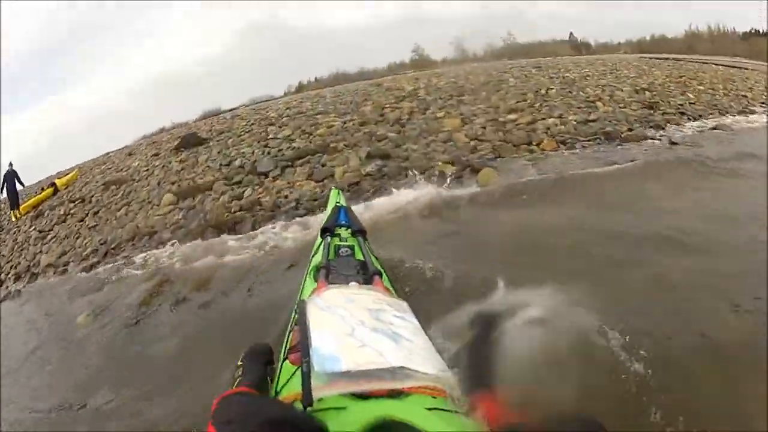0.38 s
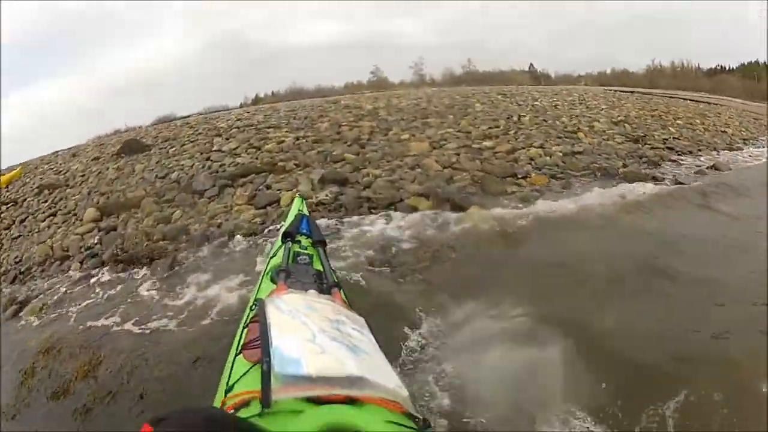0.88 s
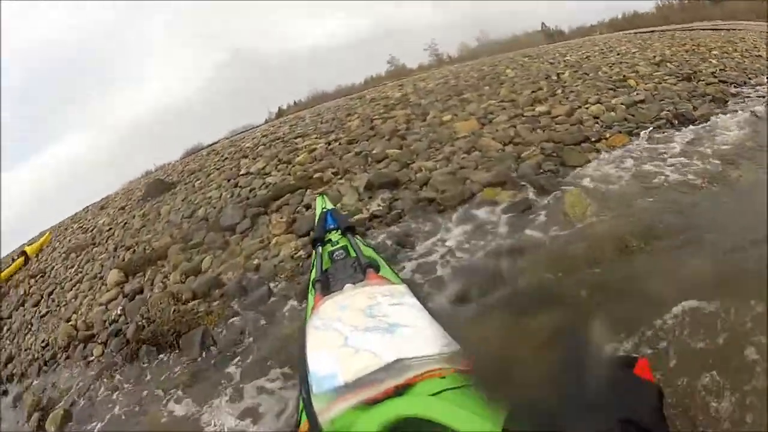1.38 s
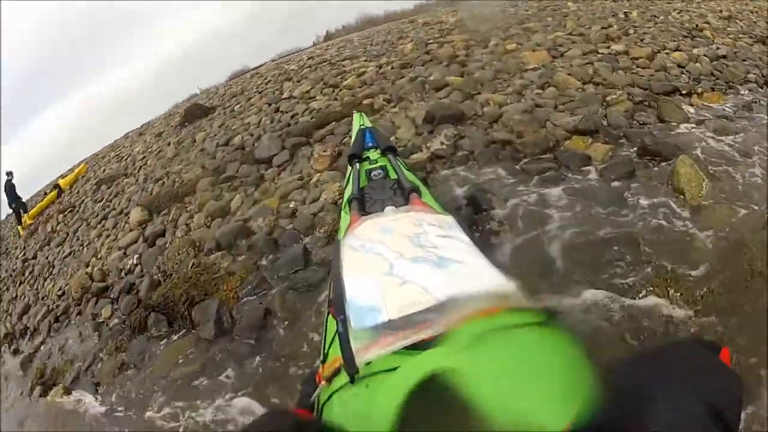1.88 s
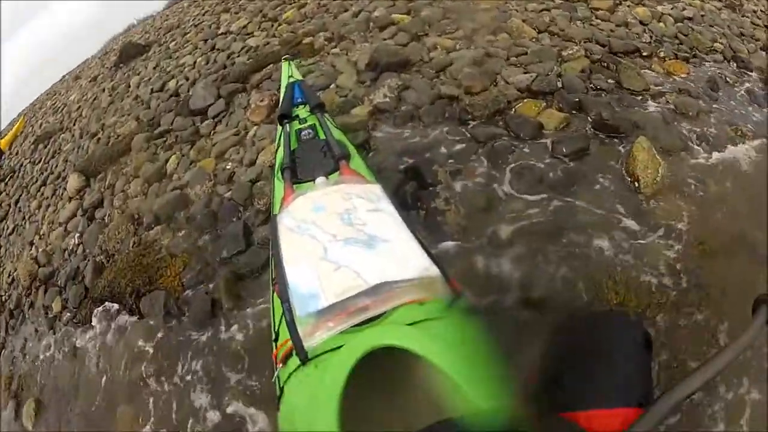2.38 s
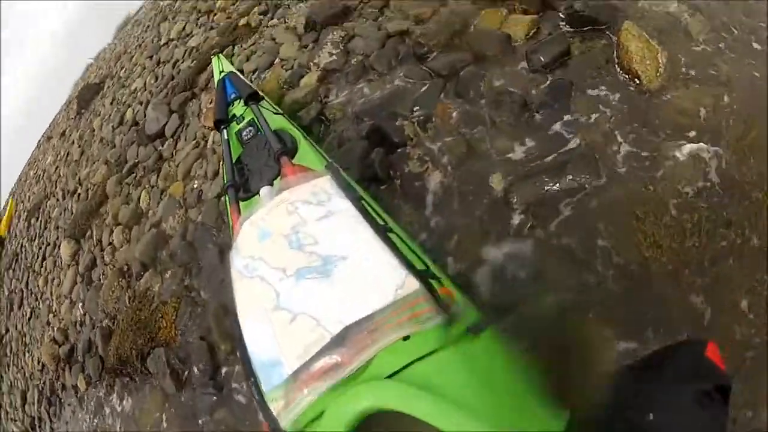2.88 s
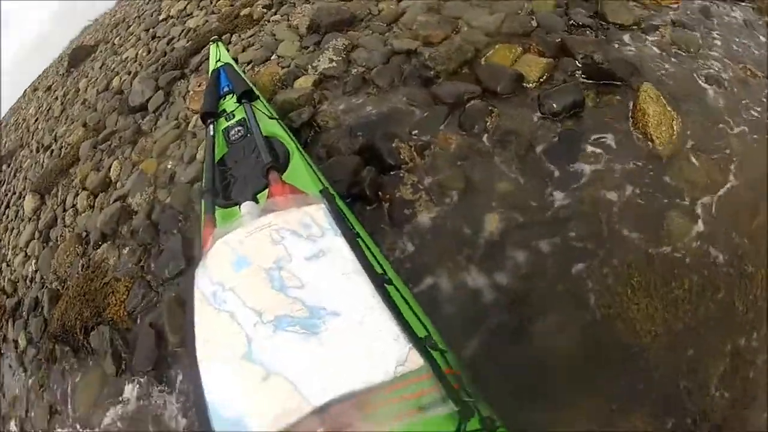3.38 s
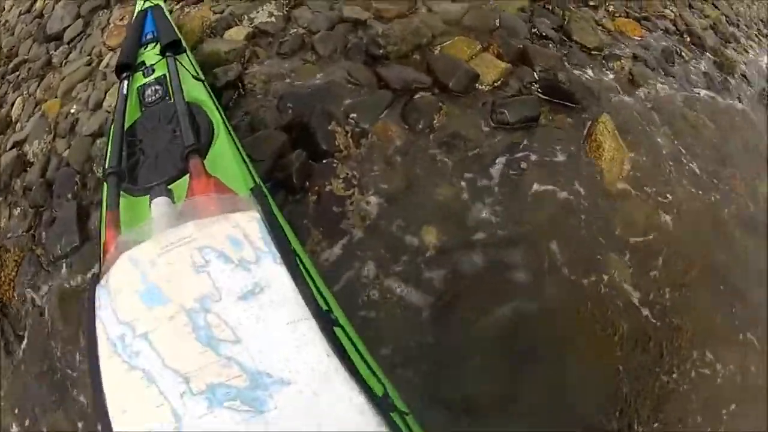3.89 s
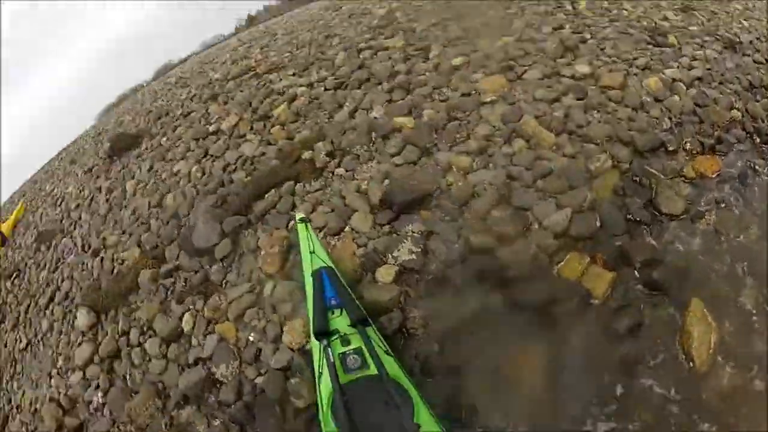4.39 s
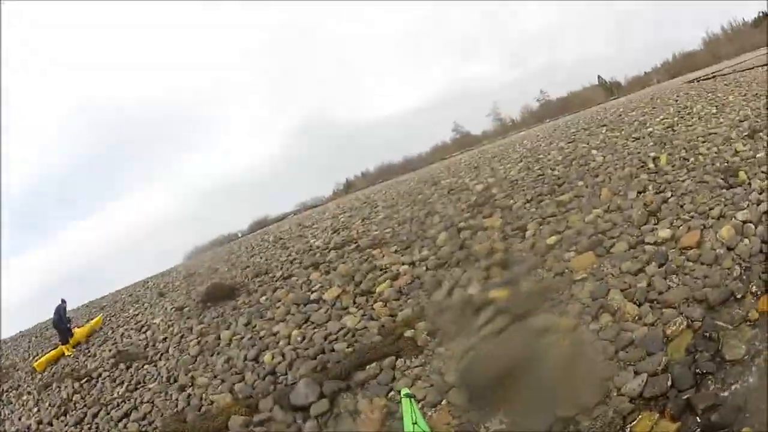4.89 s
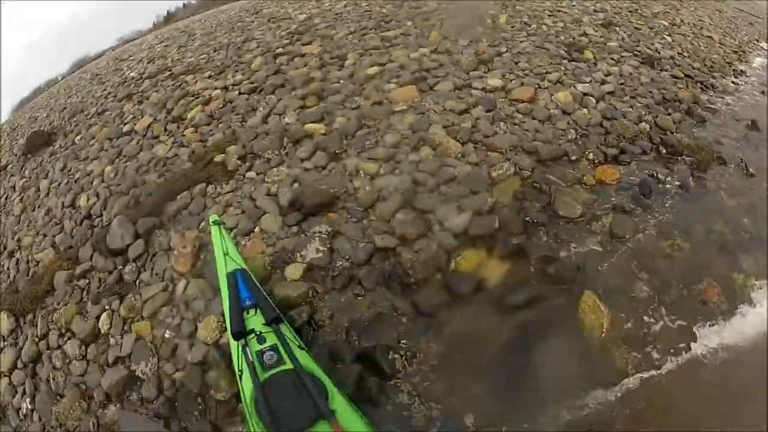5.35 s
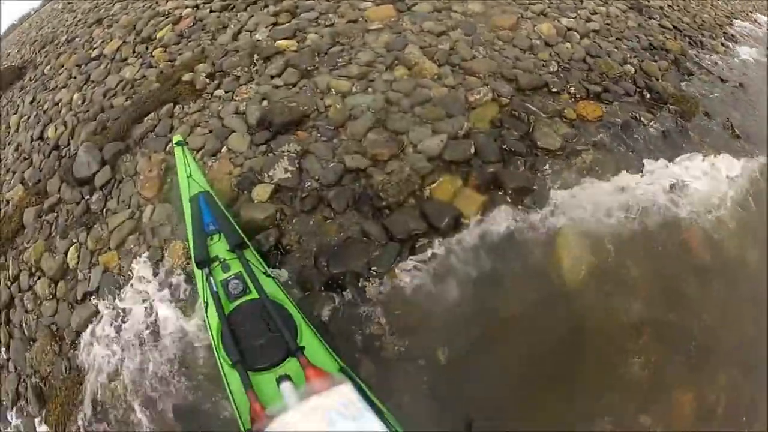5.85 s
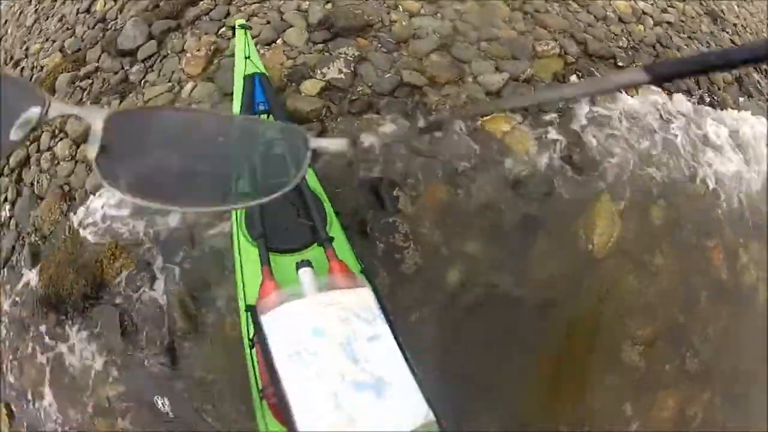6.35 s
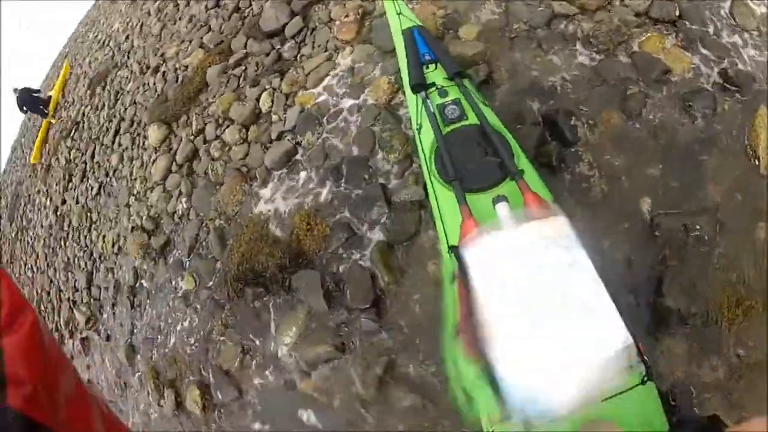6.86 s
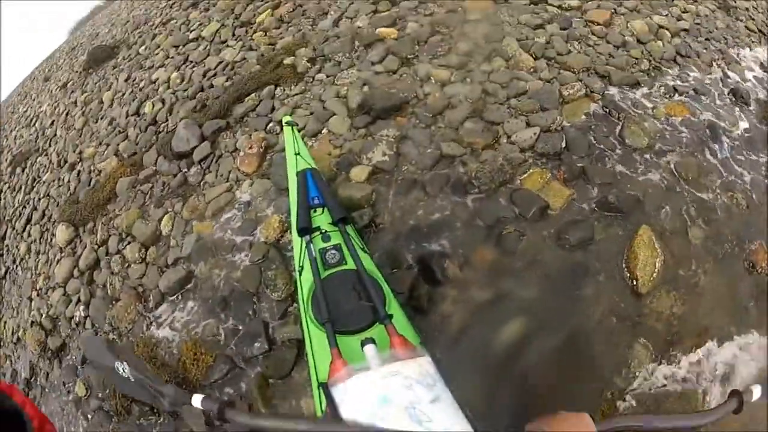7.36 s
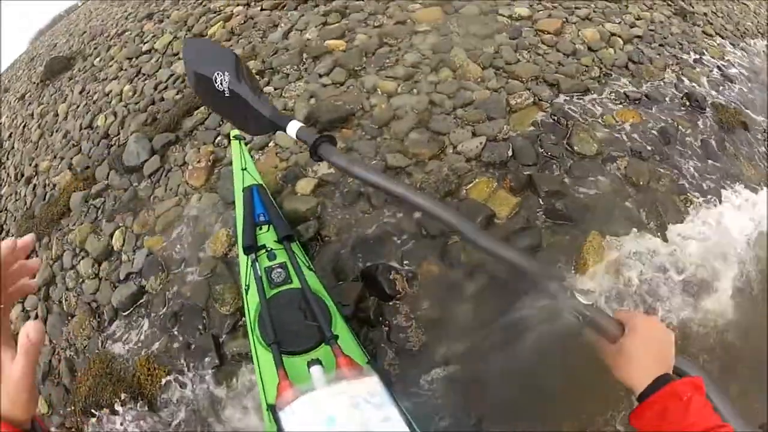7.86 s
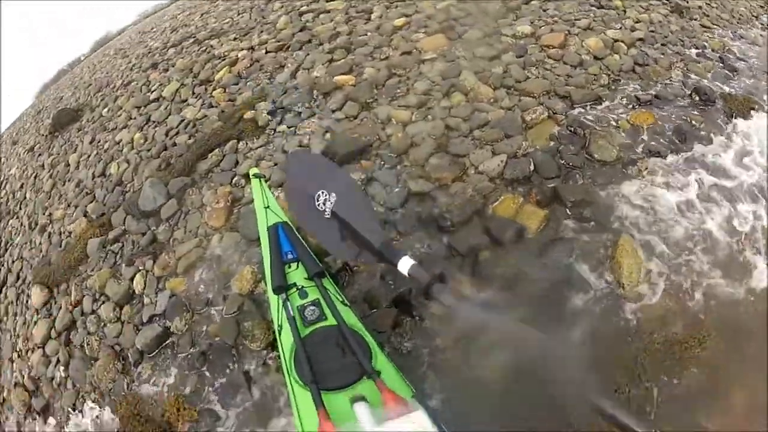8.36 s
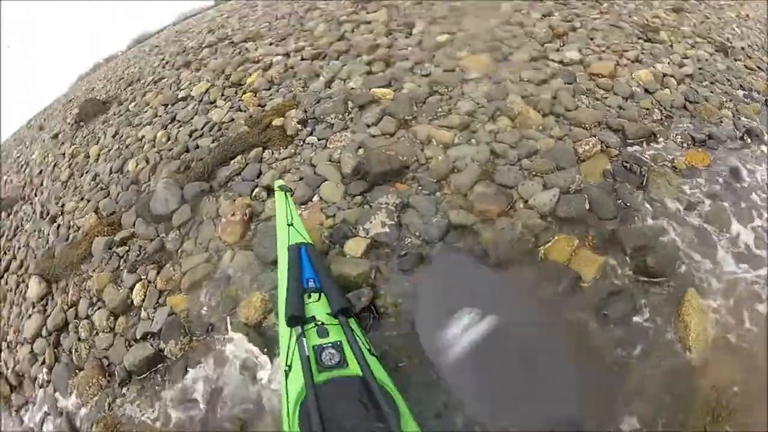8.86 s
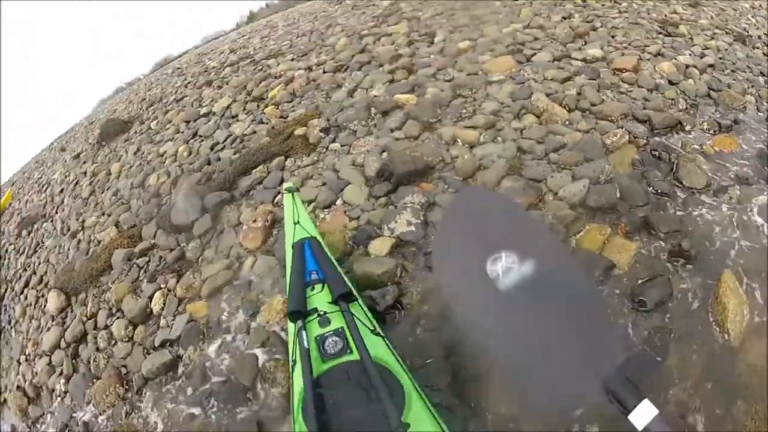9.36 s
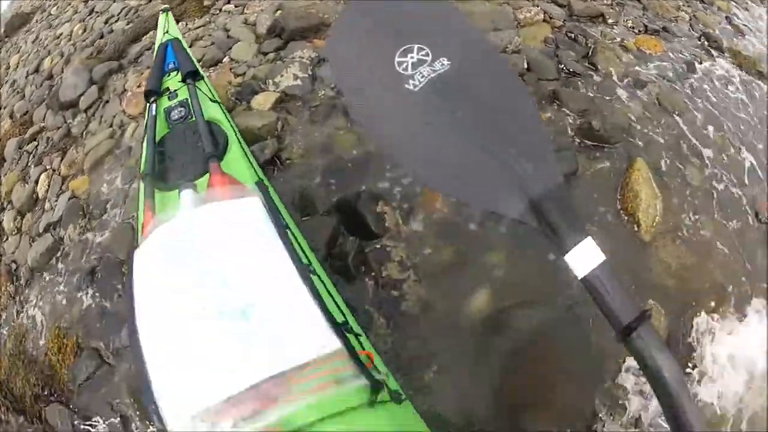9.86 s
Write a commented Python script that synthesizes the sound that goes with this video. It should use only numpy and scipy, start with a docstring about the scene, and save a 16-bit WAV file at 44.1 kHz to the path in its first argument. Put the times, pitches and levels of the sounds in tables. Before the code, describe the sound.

Muffled lapping water around a kayak at a stony shore, lumpy wind, drops ticking on a camera housing, hollow knocks, and a sudden hard plastic snap.

```python
"""Low rumbling wind and small waves washing over stones are heard throughout, around a kayak at a beach.
The waves are shaped noise with rising bubble chirps; the wind is lumpy low noise with added swells.
Drops and straps tick on the sealed plastic housing of a small camera: brief noise that rings it.
Paddle, hands and hull send dull knocks through it: soft pulses that set off dying tones.
Once a catch snaps hard, as a few short rings, and scrapes, as gritty noise that grows and lets go."""
import sys
import numpy as np
from scipy import signal
from scipy.fft import rfft, irfft
from scipy.io import wavfile
from scipy.ndimage import uniform_filter1d

SR = 44100
rng = np.random.default_rng(int(sys.argv[2]) if len(sys.argv) > 2 else 0)


def file_out(sig):
    """Save sig as 16-bit WAV at sys.argv[1]."""
    # one column per channel
    cols = np.atleast_2d(sig).T
    # limit, then scale
    lim = np.clip(cols, -1, 1)
    pcm = np.round(lim * 32767).astype(np.int16)
    wavfile.write(sys.argv[1], SR, pcm)


def convert_level_to_amplitude(level_db):
    """Map a level in decibels to its linear amplitude factor."""
    exponent = np.asarray(level_db, float) / 20
    return 10 ** exponent


N = 440559  # length in samples
HZ = np.fft.rfftfreq(4096, 1 / SR)  # frequencies at which filter gains are given


def evened(x):
    """Scales a sound to rms 1, so that a later level sets its strength."""
    return x / np.sqrt(np.mean(x ** 2) + 1e-20)


def curve(rows, column=1):
    """Joins one column of a table by straight lines, with a value at every sample."""
    rows = np.array(rows)
    return np.interp(np.arange(N) / SR, rows[:, 0], rows[:, column])


def add(mix, s, sound):
    """Mixes a sound in at time s."""
    part = mix[round(s * SR):][:len(sound)]
    part += sound[:len(part)]


def spectrum(points):
    """Turns a table of f/Hz, level/dB into a gain on the HZ grid."""
    f, db = np.transpose(points)
    return convert_level_to_amplitude(np.interp(np.log(HZ + 1), np.log(f + 1), db))


def colour(x, gain):
    """Filters by a gain without sounding ahead of time (minimum phase)."""
    log = np.log(np.maximum(gain, 1e-5))
    circle = signal.hilbert(np.r_[log, log[-2:0:-1]])
    taps = np.fft.ifft(np.exp(circle.conj())).real
    return signal.oaconvolve(x, taps)[:len(x)]


def band(lo_hz, hi_hz):
    """Gain of a soft band-pass."""
    low_side = 1 + (lo_hz / (HZ + 1)) ** 8
    high_side = 1 + (HZ / hi_hz) ** 8
    return 1 / np.sqrt(low_side * high_side)


def wobble(rate_hz):
    """Random drift of rms 1, with no changes much faster than rate_hz."""
    low_pass = signal.butter(2, rate_hz, fs=SR, output="sos")
    return evened(signal.sosfilt(low_pass, rng.standard_normal(N)))


def ring(drive, modes):
    """A push sets off dying tones, as in a struck solid; the result has peak 1."""
    t = np.arange(8000) / SR
    tones = sum(convert_level_to_amplitude(db - 60 * t / t60) * np.sin(2 * np.pi * hz * t) for hz, db, t60 in modes)
    out = signal.oaconvolve(tones, drive)[:len(t)]
    return out / abs(out).max()


def patchy(x, depth_db):
    """Patches of the spectrum swell and fade on their own, as bubble clouds come and go."""
    z = signal.stft(x, nperseg=512, noverlap=384)[2]
    field = rng.standard_normal(z.shape[::-1]).T
    field = uniform_filter1d(field, 8, axis=0)  # across frequency
    field = uniform_filter1d(field, 50, axis=1)  # across time
    return signal.istft(z * convert_level_to_amplitude(depth_db * evened(field)), nperseg=512, noverlap=384)[1][:N]


# what the sealed housing rings with: f/Hz, width/Hz, level/dB
HOUSING_RINGS = [(1112, 590, -7), (1788, 145, -7.5), (2295, 516, -3.5), (3026, 210, -10.5),
                 (3677, 600, -6.5), (4316, 550, -8), (5220, 700, -8.5)]
# narrow dips where paths cancel: f/Hz, width/Hz, level/dB
HOUSING_DIPS = [(1374, 56, -5), (2697, 120, -4.5), (6500, 120, -2)]
# what leaks through the walls: f/Hz, level/dB
WALL_LEAK = [(150, 5.5), (260, 5.5), (350, -4), (800, -18), (4000, -68)]


def housing():
    """Gain of the path into the housing: resonances over a leak, with dips where paths cancel."""
    power = spectrum(WALL_LEAK) ** 2
    for hz, width, db in HOUSING_RINGS:
        power = power + convert_level_to_amplitude(2 * db) / (1 + (2 * (HZ - hz) / width) ** 2) ** 1.5
    dips_db = sum(db * np.exp(-((HZ - hz) / width) ** 2) for hz, width, db in HOUSING_DIPS)
    return np.sqrt(power) * convert_level_to_amplitude(dips_db)


# waves on the stones: t/s, wash level/dB, low slosh level/dB,
# gurgle level/dB above the wash, fine fizz level/dB above the wash
WAVES = [(0.0, -61, -59.5, -1, -9), (1.22, -61.5, -64, -1, -4.5), (1.45, -58, -64.5, -1.5, -11.5),
         (2.67, -68.5, -64.5, 0, -8.5), (3.11, -69, -59.5, 1.5, -7.5), (4.12, -61, -62.5, -8.5, -16),
         (4.6, -62.5, -56.5, -0.5, -11), (5.81, -57, -59.5, -5.5, -7), (6.04, -60.5, -57, -7, -7.5),
         (6.51, -60.5, -55.5, 1, -9), (6.82, -62, -51, 0, -5.5), (7.12, -58, -53, 0, -7.5),
         (7.26, -58.5, -58.5, -3.5, -3.5), (7.55, -56, -55, -7.5, -9.5), (8.21, -61.5, -59, -4, -9.5),
         (8.96, -64, -56, -1.5, -15.5), (9.6, -54, -56, -4, -10), (9.99, -54, -55.5, -6.5, -6.5)]
# highest hiss of the waves: t/s, level/dB above the wash
SPRAY = [(0, -11), (1.4, -17), (2.4, -13), (4.1, -14.5), (4.65, -5), (5.05, -9.5), (5.4, -12), (7.3, -13),
         (7.6, -13), (8.25, -16), (8.7, -9)]


def surf(drops_per_s=600, drops_db=-8, spread_db=5.0, lumpy_db=0.96, slosh_lumpy_db=2.5, patch_db=1.2):
    """Hiss of countless far bubbles plus nearer droplets over a low slosh, swelling with each wavelet."""
    sizes = convert_level_to_amplitude(spread_db * np.minimum(rng.exponential(1, N), 5))
    sizes = sizes * (rng.random(N) < drops_per_s / SR)
    drops = uniform_filter1d(sizes, 120) * rng.standard_normal(N)  # each drop is a short puff
    hiss = rng.standard_normal(N) + convert_level_to_amplitude(drops_db) * evened(drops)
    hiss = hiss * convert_level_to_amplitude(lumpy_db * wobble(17.4))
    hiss = colour(evened(patchy(hiss, patch_db)), housing())
    slosh = rng.standard_normal(N) * convert_level_to_amplitude(slosh_lumpy_db * wobble(24.0))
    slosh = colour(slosh, housing() * band(71.0, 333))
    out = convert_level_to_amplitude(curve(WAVES, column=2)) * evened(slosh)
    wash_db = curve(WAVES)
    gurgle_db = wash_db + curve(WAVES, column=3)
    fizz_db = wash_db + curve(WAVES, column=4)
    spray_db = wash_db + curve(SPRAY)
    edges_hz = [320, 1400, 2900, 4400, 6000]
    for k, db in enumerate([gurgle_db, wash_db, fizz_db, spray_db]):
        band_pass = signal.butter(2, edges_hz[k:k + 2], "bandpass", fs=SR, output="sos")
        out += convert_level_to_amplitude(db) * evened(signal.sosfiltfilt(band_pass, hiss))
    return out


# a few large bubbles close by: t/s, start f/Hz, peak level/dB
PLOPS = [(9.045, 1144, -56), (9.505, 763, -49.5)]


def bubbles(count=24, cycles=6.3, glide=0.23, spread_db=2.0, clumpy_db=5., plop_s=0.006, plop_glide=110.0):
    """Single bubbles among the stones: short rising chirps that come in clumps, and a few large plops."""
    out = np.zeros(N)
    rate = 110 / count * convert_level_to_amplitude(clumpy_db * wobble(4.))  # bubbles per second at each pitch
    for hz in np.geomspace(460, 3160, count):
        u = np.arange(round(3 * cycles * SR / hz)) * hz / SR / cycles
        chirp = u ** .5 * np.exp(-3 * u) * np.sin(2 * np.pi * cycles * (u + glide * u ** 2 / 2))
        sizes = convert_level_to_amplitude(spread_db * np.minimum(rng.exponential(1, N), 4)) * (rng.random(N) < rate / SR)
        out += signal.oaconvolve(sizes, chirp)[:N]
    out = convert_level_to_amplitude(curve(WAVES) - 10.5) * evened(colour(out, housing()))  # 10.5 dB below the wash
    for s, hz, db in PLOPS:
        t = np.arange(2000) / SR
        swell = t / plop_s * np.exp(1 - t / plop_s)
        add(out, s, convert_level_to_amplitude(db) * swell * np.sin(2 * np.pi * hz * (t + plop_glide * t ** 2 / 2)))
    return out


# tone of the wind, before it is scaled to rms 1: f/Hz, level/dB per Hz
WIND_TONE = [(8.8, -28.5), (15, 3.5), (41, 0.5), (80, -9.5), (124, -23.5), (200, -26.5), (260, -37),
             (440, -120)]
# slowly changing part of the wind: t/s, level/dB
BREEZE = [(0.0, -53), (0.47, -45), (1.83, -50.5), (2.2, -47), (5.26, -51), (6.4, -46.5), (9.65, -52.5),
          (9.99, -61)]
# low swells from gusts and from the housing swaying when knocked: peak t/s, level/dB
SWELLS = [(0.3, -37.5), (0.7, -43), (0.94, -37.5), (1.14, -40), (1.39, -39), (2.08, -36.5), (2.17, -37.5),
          (3.06, -40), (5.6, -42), (5.9, -35), (6.68, -34.5), (7.04, -31), (7.2, -41), (7.93, -35),
          (8.13, -41.5), (8.51, -38.5)]


def wind(rise_s=0.027, fall_s=0.026):
    """A lumpy low rumble of wind, with low swells from gusts and from the housing swaying when knocked."""
    t = np.arange(N) / SR
    power = convert_level_to_amplitude(2 * curve(BREEZE))
    for s, db in SWELLS:
        power = power + convert_level_to_amplitude(2 * db) * np.exp(-2 * abs(t - s) / np.where(t < s, rise_s, fall_s))
    rumble = colour(rng.standard_normal(N), spectrum(WIND_TONE))
    return np.sqrt(power) * evened(rumble)


# sharp ticks on the housing: t/s, peak level/dB, treble boost level/dB,
# level/dB of the spatter after it, against the start of the tick
TICKS = [(0.2022, -32.5, -5, -25), (0.2059, -34, -13, -30), (0.2124, -31, -10, -24), (0.2466, -42, -6, -20),
         (1.152, -44, 3, -18), (2.3624, -38.5, -2, -10), (2.3725, -35.5, -5, -11), (2.5533, -30, -39, -30),
         (2.5567, -23.5, -16, -27), (2.5815, -35, -19, -21), (2.6144, -41, -12, -20),
         (2.6179, -37.5, -9, -3), (2.7033, -33.5, -9, -28), (2.7063, -36, -9, -25), (2.751, -40, -9, -10),
         (5.2683, -39.5, -10, -17), (6.9528, -36.5, 17, -24)]


def ticks(rise=0.0007, decay=0.002, spatter_s=0.021, focus=0.89, count=12):
    """Drops and straps: each tick is a dying spatter of noise that rings the housing and the wall it hits."""
    out, t = np.zeros(N), np.arange(3000) / SR
    treble = 1 / (1 + (3000 / (HZ + 1)) ** 8)
    wall = 1 + convert_level_to_amplitude(5.5) / np.hypot(1, 2 * (HZ - 2170) / 430)  # the struck wall rings near 2170 Hz
    wash_db = curve(WAVES)
    # small drops at random moments, 10.5 to 14.5 dB above the wash
    faint = [(u * N / SR, wash_db[int(u * N)] + 10.5 + 4 * v, -4, 11) for u, v in rng.random((count, 2))]
    rows = TICKS + faint
    for (s, db, treble_db, spatter_db), noise in zip(rows, rng.standard_normal((len(rows), len(t)))):
        fade = np.exp(-t / decay) + convert_level_to_amplitude(spatter_db) * np.exp(-t / spatter_s)
        envelope = (1 - np.exp(-t / rise)) * fade
        boost = 1 - treble + treble * convert_level_to_amplitude(treble_db)
        tick = colour(noise * envelope, housing() ** focus * band(1180, 9000) * wall * boost)
        add(out, s, convert_level_to_amplitude(db) * tick / abs(tick).max())
    return out


# short rubs that grind the hard part of a knock: t/s, length/s, peak level/dB
RUBS = [(3.929, 0.026, -50), (5.602, 0.059, -42), (5.864, 0.015, -37.5), (5.88, .011, -26.5),
        (5.89, 0.011, -24.5), (6.966, 0.0089, -31), (7.248, 0.017, -45)]
# hard part of knocks and rubs, before scaling to peak 1: f/Hz, level/dB, time to fall 60 dB/s
CLACK = [(714, 9.5, 0.0038), (1094, 15.5, 0.015), (1590, 8, 0.013), (1850, 1, 0.013)]


def rubs():
    """Rough contact lasts a moment: a stroke of noise keeps the hard tones ringing."""
    out = np.zeros(N)
    tap = signal.windows.hann(17)  # hard contact, in samples
    for (s, length, db), noise in zip(RUBS, rng.standard_normal((len(RUBS), 4000))):
        stroke = signal.windows.tukey(round(length * SR), .5)
        add(out, s, convert_level_to_amplitude(db) * ring(np.convolve(stroke * noise[:len(stroke)], tap), CLACK))
    return out


# dull knocks: t/s, peak level/dB of the boom, clack level/dB above it, push level/dB above it,
# pitch of the boom as a ratio
KNOCKS = [(0.201, -34.5, 1, -13, 1.04), (0.755, -41.5, -19, -18, 0.72), (1.127, -41, -20, -23, 0.88),
          (1.628, -40.5, -16, -9, 0.82), (2.137, -40, -28, -18, 1.01), (2.372, -48, 11.5, -7, 1.7),
          (2.689, -37, -4, -22, 0.9), (3.062, -32, -5.5, -32, 0.89), (5.594, -28, -1.5, -1, 0.97),
          (5.643, -50.5, -5, 20.5, 1.2), (5.844, -18, -6, -8.5, 1.01), (6.587, -32.5, -15, -22, 0.8),
          (6.629, -36.5, -4, 3, 0.85), (6.963, -22, -14, -8.5, 0.84), (6.9855, -39, 12.5, 4, 1.2),
          (7.0068, -29, 2.5, -22, 1.04), (7.184, -37.5, -5, -7, 1.06), (9.637, -29, -10.5, -31, 1.27),
          (9.68, -38, -18, -16, 0.86), (9.809, -29.5, -34.5, -32, 1.05)]
# boom, before the pitch ratio and scaling to peak 1: f/Hz, level/dB, time to fall 60 dB/s
BOOM = [(250, 10, 0.047), (308.5, 11.5, 0.027), (407, -12.5, 0.078)]
# shove on the microphone, before scaling to peak 1: f/Hz, level/dB, time to fall 60 dB/s
PUSH = [(59, -23, 0.091), (108.7, 5, 0.12)]


def judder(count=8, gap_s=0.0118, uneven_s=0.00055, fade_db=-2.15, uneven_db=1.5):
    """Something judders along the hull: rows for a run of uneven, fading knocks."""
    return [(7.031 + k * gap_s + uneven_s * v, -30.5 + k * fade_db + uneven_db * u, -0.5, -18, 1)
            for k, (u, v) in enumerate(rng.standard_normal((count, 2)))]


def knocks(lag=0.00174, grit=0.6, boom_rise_s=0.0015):
    """Paddle, hands and hull: soft contact booms and shoves, then hard contact clacks lag seconds later."""
    out = np.zeros(N)
    touch, tap = signal.windows.hann(60), signal.windows.hann(17)  # soft and hard contact, in samples
    build = (1 - np.exp(-np.arange(8000) / SR / boom_rise_s)) ** 2  # the boom takes a cycle to build
    skid = np.exp(-np.arange(200) / 60.)  # the hard contact skids a little
    rows = KNOCKS + judder()
    for (s, db, clack_db, push_db, pitch), noise in zip(rows, rng.standard_normal((len(rows), 200))):
        boom = ring(touch, np.multiply(BOOM, [pitch, 1, 1])) * build
        boom = boom / abs(boom).max()
        add(out, s, -convert_level_to_amplitude(db) * (boom + convert_level_to_amplitude(push_db) * ring(touch, PUSH)))
        contact = np.r_[tap, grit * np.convolve(skid * noise, tap) / 3]
        add(out, s + lag, convert_level_to_amplitude(db + clack_db) * ring(contact, CLACK))
    return out


# tone of the scrape, before it is scaled to rms 1: f/Hz, level/dB per Hz
SCRAPE_TONE = [(290, -52), (500, -37), (793, -17), (916, 0.5), (1090, -3), (1640, 1), (2040, -9.5),
               (3550, -2), (4400, -12.5), (4870, -15), (5800, -27), (7540, -60), (12800, -120)]


def scrape():
    """The catch slides to rest after the snap, drags over plastic ever harder, then slips and lets go."""
    slide_s, slide_db, slide_t60_s = 6.4965, -29, 0.041
    drag_s, drag_db, drag_db_per_s, drag_onset_s = 6.537, -44.5, 278, 0.01
    slip_s, slip_length_s, slip_db, grip_s = 6.5838, 0.0096, -23, 0.0018  # grip_s: how fast it sets in
    let_go_t60_s = 0.007
    t = np.arange(N) / SR
    grit = rng.standard_normal(N) * convert_level_to_amplitude(2.2 * wobble(260))  # it sticks and slips unevenly
    end = slip_s + slip_length_s
    slide = (t > slide_s) * convert_level_to_amplitude(slide_db - 60 * abs(t - slide_s) / slide_t60_s)
    drag = convert_level_to_amplitude(drag_db + drag_db_per_s * (np.minimum(t, end) - drag_s))
    drag = drag * np.clip((t - drag_s) / drag_onset_s, 0, 1)
    slip = np.clip((t - slip_s) / grip_s + 1, 0, 1) * convert_level_to_amplitude(slip_db)
    held = convert_level_to_amplitude(-60 * np.maximum(t - end, 0) / let_go_t60_s)
    level = slide + np.maximum(drag, slip) * held
    return level * evened(colour(grit, spectrum(SCRAPE_TONE)))


# chatters of the catch, before the band-pass: t/s, length/s, peak level/dB
SNAP = [(6.4734, 0.00558, 0.5), (6.4834, 0.0029, -2.5), (6.4906, 0.002, -10.5), (6.4937, 0.002, -21)]
# what each chatter rings with, before scaling to peak 1: f/Hz, level/dB, time to fall 60 dB/s
SNAP_RING = [(1140, 5, 0.016), (1970, 0.5, 0.016), (2490, 9, 0.1), (3460, 5, 0.019), (4850, 1.5, 0.015)]


def snap(jolt_pull=0.65, jolt_rebound=0.37, jolt_settle_s=0.004):
    """The catch chatters a few times, as short rings with brief gaps between, and jolts the microphone."""
    start, pull_s = SNAP[0][:2]
    u = np.arange(N) / SR - start
    # the first chatter pulls the diaphragm, which springs back
    pull = -jolt_pull * np.clip(u / pull_s, 0, 1)
    rebound = jolt_rebound * np.exp(-abs(u - pull_s) / jolt_settle_s)
    jolt = np.where(u < pull_s, pull, rebound)
    out = uniform_filter1d(uniform_filter1d(jolt, 50), 50)  # the diaphragm is sluggish
    t = np.arange(600) / SR
    for (s, length, db), noise in zip(SNAP, rng.standard_normal((len(SNAP), 600))):
        strike = np.exp(-t / 0.00004) + 0.17 * noise * np.exp(-t / 0.002)
        chatter = ring(strike, SNAP_RING)[:len(t)]
        ending = np.maximum(np.exp(-np.maximum(t - length, 0) / 0.0003), 0.03)  # a faint rest stays
        add(out, s, convert_level_to_amplitude(db) * colour(chatter * ending, band(810, 16000)))
    return out


def scene():
    """All sources, one channel."""
    return (surf() + bubbles() + wind() + ticks() + rubs() + knocks() + scrape() + snap())[None]


def gain_control(x, duck_from_db=-28, duck_share=0.12, recover_db_per_s=29):
    """Turns the level down after loud hits, by a share of the excess, and lets it recover steadily."""
    power_db = 10 * np.log10(abs(uniform_filter1d(x ** 2, 300)) + 1e-12)
    fall = np.arange(N) * recover_db_per_s / SR
    peak_db = np.maximum.accumulate(power_db + fall) - fall
    over_db = np.maximum(peak_db - duck_from_db, 0)
    duck_db = signal.lfilter([.002], [1, -.998], duck_share * over_db)
    return x / convert_level_to_amplitude(duck_db)


def slow_converter(x, hold_hz=12000):
    """Holding each sample mirrors the sound around the hold rate and softens the treble."""
    low = signal.oaconvolve(x, signal.firwin(301, hold_hz / 2, fs=SR), "same")
    mirrored = low * (1 + 2 * np.cos(2 * np.pi * hold_hz * np.arange(N) / SR))
    hz = np.fft.rfftfreq(N, 1 / SR)
    lift = convert_level_to_amplitude(2.0 * (hz / 14500) ** 4)  # the output stage lifts the top a little
    edge = convert_level_to_amplitude(-19) + (1 - convert_level_to_amplitude(-19)) / (1 + (hz / 15150) ** 150)  # step down above 15150 Hz
    return irfft(rfft(mirrored) * np.sinc(hz / hold_hz) * lift * edge, N)


def top_cut(x):
    """Nothing passes above the cut-off."""
    return signal.sosfilt(signal.butter(12, 17110, fs=SR, output="sos"), x)


def record(dry):
    """Gain control ducks after loud hits, overload rounds the peaks, a slow converter holds each sample."""
    ceiling = 0.51  # of full scale
    heard = gain_control(dry[0])
    heard = heard / (1 + (heard / ceiling) ** 4) ** (1 / 4)
    held = slow_converter(heard)
    return top_cut(held)


dry = scene()
out = record(dry)
file_out(out)
```